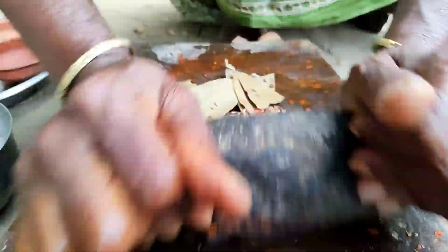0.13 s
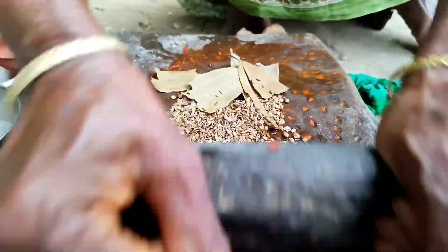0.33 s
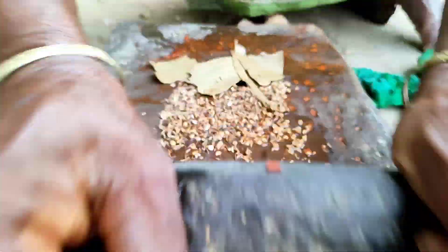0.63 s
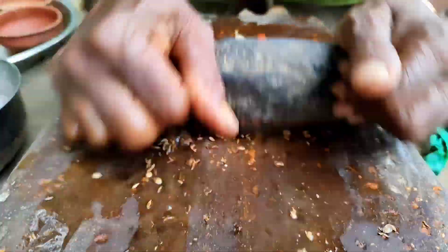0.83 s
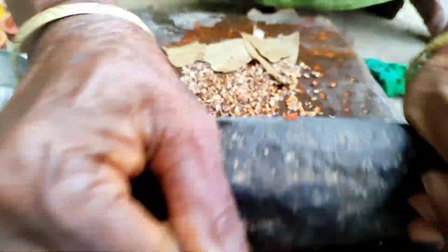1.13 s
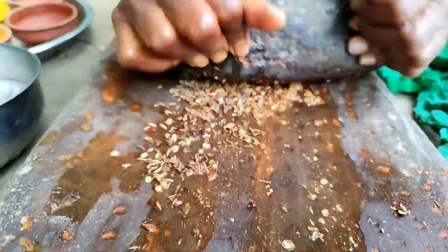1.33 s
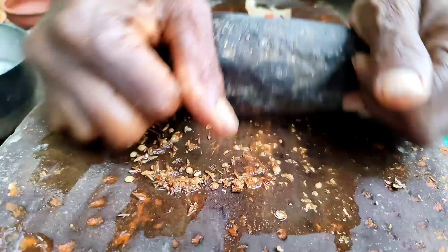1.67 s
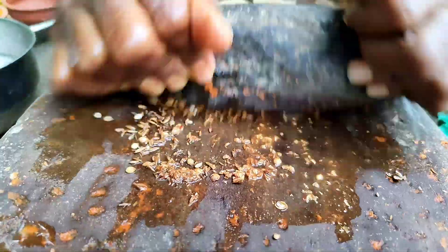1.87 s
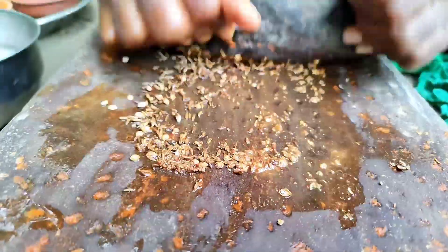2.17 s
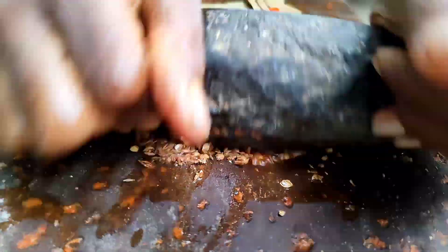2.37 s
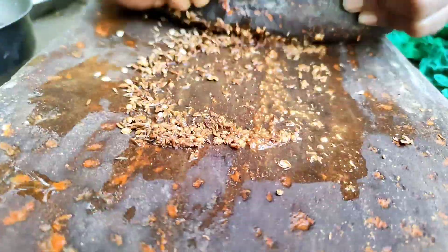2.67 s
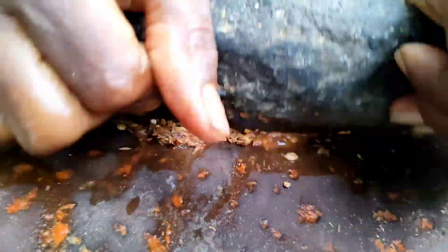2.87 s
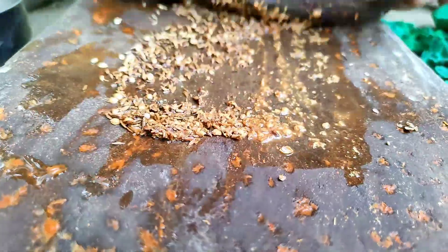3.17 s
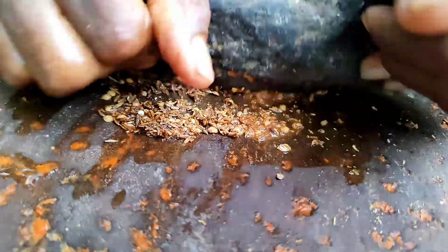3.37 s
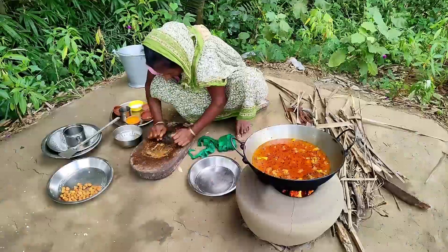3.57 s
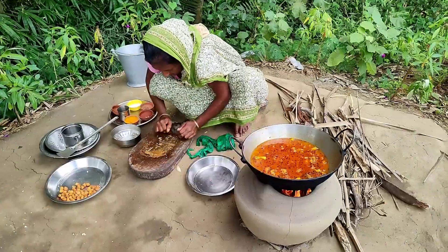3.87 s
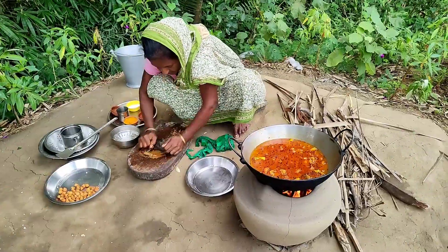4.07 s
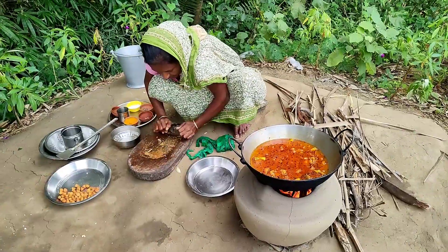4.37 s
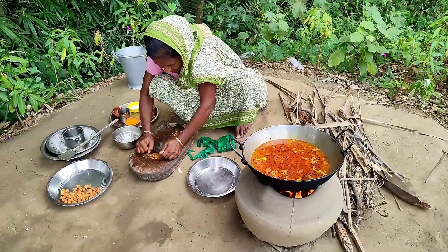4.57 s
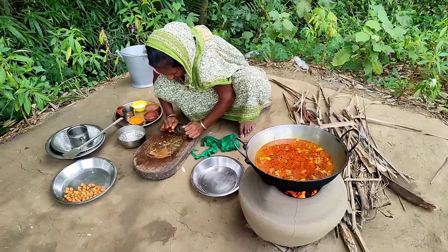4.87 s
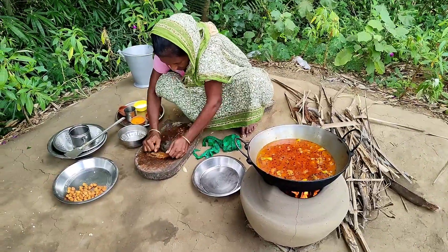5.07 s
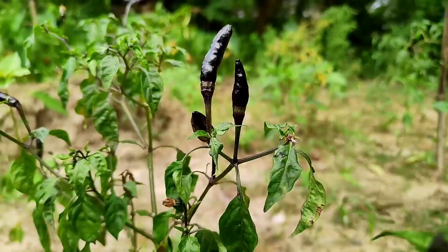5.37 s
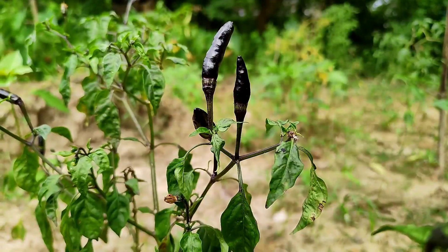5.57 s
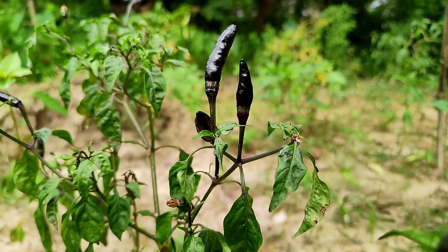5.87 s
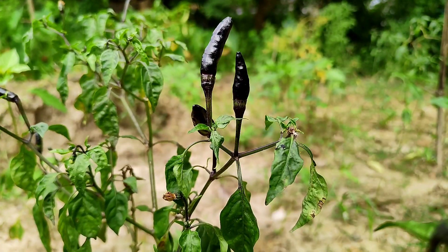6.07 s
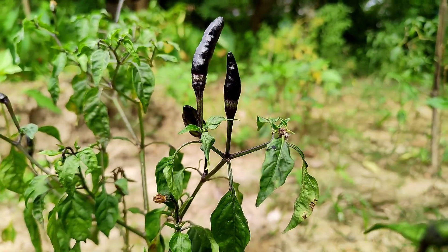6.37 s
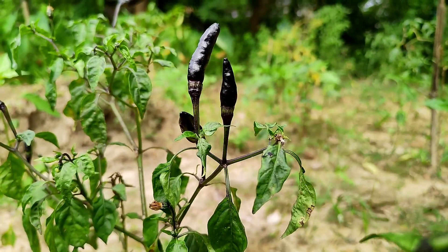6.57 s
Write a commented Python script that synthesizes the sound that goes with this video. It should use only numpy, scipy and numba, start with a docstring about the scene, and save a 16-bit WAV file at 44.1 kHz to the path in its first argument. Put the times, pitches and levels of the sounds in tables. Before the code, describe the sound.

A stone roller scrapes quickly back and forth over a stone slab, crunching dry seeds up close, then fades to faint distant grinding and garden hush.

```python
"""A stone roller is pushed and pulled over a stone slab outdoors, crushing dry seeds.
For 3.8 s it is close: grit cracks in dense clicks, the rough faces make the stones ring and groan,
the roller knocks, seeds burst as short noise, and four dull bumps are rumbles of filtered noise.
Then it works on some metres away until about 5.6 s, with a faint far chirp of narrow noise near 4 s.
From start to end lie a noise hush, gusty low wind and throbbing insects, heard alone at the end."""
import sys
import numpy as np
from scipy import signal
from scipy.fft import rfft, irfft
from scipy.io import wavfile
from scipy.ndimage import uniform_filter1d
from numba import njit

SR = 44100
rng = np.random.default_rng(int(sys.argv[2]) if len(sys.argv) > 2 else 0)


def bounce(signal):
    """Save signal as a 16-bit WAV file at the path given by the first command-line argument."""
    frames = np.transpose(np.atleast_2d(signal))
    limited = np.clip(frames, -1, 1)
    pcm = np.round(limited * 32767).astype(np.int16)
    wavfile.write(sys.argv[1], SR, pcm)


N = 295594

# Pushes and pulls. Each layer swells to a crest (a place from 0 to 1 along the stroke) and fades,
# more narrowly when "peaked" is high. Each row: start in seconds, length in seconds, grit crest, peaked,
# coarse grit in dB, middle grit relative to coarse in dB, fine grit relative to coarse in dB,
# ring crest, peaked, roller ring in dB, groan crest, peaked, slab groan in dB, edge ring in dB,
# thud crest, peaked, ground thud in dB, groan pitch at mid stroke in Hz, basic lean to the left in dB.
STROKES = [(-0.12, 0.18, 0.4, 1.6, -51, -11, -13, 0.45, 3.8, -28, 0.53, 4.2, -40, -38, 0.64, 0.7, -63, 754.0, 1),
           (0.054, 0.3, 1, 0.91, -42, -7, -11, 0.29, 9.8, -36, 0.22, 15.6, -36.5, -41.5, 0.5, 22, -61.5, 732, 2.5),
           (0.203, 0.27, 0.57, 7.1, -45, 0.5, -2.5, 0.63, 6.2, -33, 0.69, 8.1, -37.5, -38.5, 0.66, 4.5, -52.5, 713, 0.5),
           (0.475, 0.26, 0.67, 2.3, -43, -6.0, -9.5, 0.47, 3.5, -37.5, 0.28, 11.5, -39, -40.5, 0.6, 13, -53.5, 755, 1.5),
           (0.704, 0.24, 0.18, 8.6, -33.5, -1, -4.5, 0.07, 3.4, -36, 0.3, 2.7, -48, -44.5, 0.25, 3.4, -51.5, 726.0, 3),
           (0.914, 0.2, 0.7, 2.8, -42.5, -7, -10.5, 0.59, 4.3, -38.5, 0.41, 25, -40, -45.5, 0.46, 3.5, -50, 794.0, 2.5),
           (1.104, 0.27, 0.27, 9.8, -33, -3.5, -7, 0.25, 5.9, -39, 0.4, 8.3, -43.5, -43, 0.39, 4.5, -47.5, 703, 3.5),
           (1.285, 0.26, 0.69, 2.9, -48, -11.5, -12.5, 0.8, 5.1, -32.0, 0.7, 5.5, -40, -51, 0.69, 5.5, -47.5, 756, 3.5),
           (1.5, 0.28, 0.49, 5.5, -34.5, -4.5, -6.5, 0.41, 7.2, -39, 0.53, 4.3, -52.5, -50, 0.49, 2.8, -56, 745.0, 2.5),
           (1.788, 0.292, 0.38, 2.1, -44, -6.5, -7.5, 0.48, 4.8, -47, 0.33, 1.9, -66, -59, 0.37, 12, -55.5, 811.5, 2.5),
           (2.006, 0.28, 0.22, 8.5, -29.5, -3.5, -6.5, 0.12, 6.6, -38.5, 0.27, 6.9, -54.5, -49, 0.17, 3.5, -54, 754.0, 4.5),
           (2.228, 0.299, 0.31, 4.7, -42, -5, -8.5, 0.39, 11.7, -42.5, 0.24, 8.3, -62, -57, 0.28, 15, -57, 745.7, 4.5),
           (2.426, 0.25, 0.24, 5.5, -31, -1.5, -5, 0.2, 5.0, -40, 0.36, 5, -52, -45.5, 0.38, 7.1, -48, 720.0, 4.0),
           (2.643, 0.25, 0.38, 6.2, -44.5, -5.5, -5, 0.56, 5.6, -45.5, 0.45, 4.8, -61.5, -53, 0.38, 8, -54, 685.4, 8),
           (2.815, 0.28, 0.44, 6.7, -34.0, -3.0, -6.5, 0.34, 10.2, -38, 0.44, 4, -53.5, -46, 0.56, 6.5, -52.5, 729, 4.5),
           (3.057, 0.25, 0.45, 6.4, -43.0, -2.5, -5, 0.72, 3.1, -41.5, 0.79, 7.2, -48, -40, 0.55, 7.9, -47.5, 687, 4),
           (3.27, 0.28, 0.44, 3.53, -31, -5, -8, 0.5, 6.4, -40.5, 0.56, 4.3, -55, -55, 0.45, 2.1, -52.5, 741.5, 2),
           (3.555, 0.25, 0.38, 6.9, -45.0, -2.5, -4.5, 0.37, 3.7, -55.0, 0.38, 6.8, -65, -56, 0.37, 15, -54.0, 754.0, 4.5),
           (3.72, 0.117, 0.071, 2.6, -60.5, -7.5, -0.5, 0.24, 4.6, -54.5, 0.06, 0.76, -78.0, -74.5, 0.23, 5.4, -65.0, 734, -4),
           (3.847, 0.181, 0.58, 2.8, -65.5, -10, 1.0, 0.34, 2.7, -64.5, 0.61, 2.7, -77.5, -82, 0.21, 0.66, -76.0, 736.7, -2),
           (4.053, 0.31, 0.31, 10.8, -63.5, -5, -1.5, 0.35, 10, -58, 0.26, 4.7, -74, -72, 0.37, 4, -73.5, 721, -2.0),
           (4.256, 0.223, 0.64, 4.4, -69.0, -3.5, 2.5, 0.53, 4.0, -62.5, 1, 0.83, -80.5, -87, 0.61, 4.2, -78.5, 743, -5),
           (4.494, 0.277, 0.39, 10, -59.5, -8, -7.5, 0.39, 8.8, -55.5, 0.37, 7.9, -71, -69.5, 0.65, 10.4, -77.0, 725, -3.5),
           (4.741, 0.257, 0.42, 5.5, -65, -19, -4, 0.35, 4, -60.5, 0.48, 5, -74.5, -82.5, 0.33, 4.2, -71, 737, -2),
           (4.939, 0.29, 0.4, 5.7, -61, -4.5, -1.5, 0.51, 12.3, -51.5, 0.4, 3.2, -73.5, -69.5, 0.49, 2.8, -74.5, 701, -3),
           (5.212, 0.27, 0.34, 12.8, -58.5, -7, 1, 0.27, 5.6, -65.0, 0.88, 0.76, -84, -80, 0.2, 11.3, -73, 731.0, -7),
           (5.45, 0.167, 0.42, 3.3, -58, -7.5, -5, 0.43, 6.0, -55, 0.29, 4.6, -75, -57.5, 0.49, 3.0, -73.5, 755.0, 0)]
# Stone meets stone. Each row: time in seconds, relative strength in dB,
# relative slab share in dB, relative hardness (share of the edge) in dB.
KNOCKS = [(0.083, -50, -27, 10), (0.0982, -43, -30, 13.5), (0.1777, -30, -15, -9), (0.2466, -33, -14, -14),
          (0.292, -26, -21, -17), (0.3444, -32, -7, -2), (0.3738, -25, -10.5, -5), (0.414, -29.5, -1, -1.5),
          (0.512, -54, -6, 12), (0.5496, -53.5, 5, -9), (0.5863, -24.5, -18, -20), (0.6685, -25, -39, -25),
          (0.7698, -20.5, -15, -33), (0.84, -45, 5, 4), (0.8638, -40.5, -2, -14), (0.9675, -42, -4.5, -20),
          (0.9862, -16, -17.5, -16.5), (1.0496, -45, -35, -24), (1.1296, -36.5, -22, -13),
          (1.1896, -21, -19, -9), (1.2217, -31, -1.5, -2), (1.3568, -40.5, -4.5, -8),
          (1.4054, -31, -12, -14), (1.4263, -20, -36.5, -6.5), (1.4379, -19, -18.5, -19),
          (1.454, -12, -17, -21), (1.4672, -17.5, -23, -25.5), (1.4786, -7, -31.5, -9),
          (1.4941, -11.5, -23.5, -22.5), (1.5782, -31, -14, -25), (1.6026, -35, -19, -7),
          (1.8293, -49.5, -14, 9), (1.8706, -33, -33, -30), (2.0294, -32, -30, -24),
          (2.0683, -31, -20, -15), (2.314, -40, -18, -20), (2.7636, -36, -20, -11),
          (2.8714, -30, -20.5, -7), (3.2022, -34, -23, -20), (3.2322, -25.5, -22, -16),
          (3.2444, -22.5, -18, -9), (4.814, -46.5, -27, -25), (5.4865, -38.5, -28, -3.5)]
# Single seeds burst. Each row: time in seconds, relative strength in dB, pitch in Hz, left minus right in dB.
SEEDS = [(0.213, -35, 4020, 3), (0.2883, -22, 4200, -4), (0.415, -13.5, 3300, 1), (0.633, -22, 3730, -4),
         (0.7243, -24, 3150, 2), (1.125, -31, 3180, 0.0), (1.1425, -18, 6370, 12), (1.154, -12, 6020, -9),
         (1.4775, -29, 3230, -1.5), (1.527, -20.5, 4360, -14.5), (1.5529, -11.5, 6400, -2),
         (1.5905, -30, 3550, -7), (1.6204, -4.5, 3650, 3), (1.8182, -24.5, 2560, 13),
         (1.855, -12, 3760, 7.5), (1.9731, -18, 3700, 7), (2.0103, -38, 3760, -0.5),
         (2.0247, -19, 3940, -4), (2.397, -18.5, 3680, 5), (2.4493, -40, 3600, 4), (2.4504, -38.5, 3000, 8),
         (2.6417, -26, 12300, -3), (2.832, -22, 4800, -1), (2.8888, -23, 4040, -17), (3.0984, -40, 3890, 1),
         (3.1118, -17, 5870, -1), (3.2923, -10.5, 4470, -6), (3.3144, -22, 3350, 19), (3.334, -16, 3530, 7),
         (5.2784, -37.5, 4080, -3)]

# Ringing tones (modes) of each body. Each row: pitch in Hz, relative level in dB,
# time to fall by 60 dB in seconds.
ROLLER_MODES = [(1273, -22, 0.027), (1330, 1, 0.081), (1357.5, -2.5, 0.044), (1480, -23, 0.041)]
SLAB_MODES = [(507, -13, .025), (700, 1, 0.064), (770, -2.5, 0.036), (943, -2.5, 0.15)]
EDGE_MODES = [(1689, -3, 0.062), (1903, -1.5, 0.066), (2080, -1.5, 0.024), (2450, -6.5, 0.017),
              (3190, -8.5, 0.007), (3523, -11.5, 0.02)]
GROUND_MODES = [(137, 3.5, 0.028), (163.3, 8.2, 0.05)]

# Colour of coarse, middle and fine grit. Each row: frequency in Hz, relative level in dB.
COARSE_COLOUR = [(250, -22.5), (500, -18.5), (1000, -20), (1600, -12), (2200, -5.5), (2900, -2), (3400, 1),
                 (4000, 0), (4600, -6), (5200, -17.5), (8000, -49)]
MIDDLE_COLOUR = [(3000, -34.5), (4700, -16), (5300, -11), (6200, -0.5), (6900, -11.5), (7500, -14.5),
                 (8300, -21.5), (11000, -47.5)]
FINE_COLOUR = [(5000, -45), (7300, -15.5), (8100, -1.5), (8800, -3), (10500, -6.5), (12300, -7),
               (13400, -6.5), (14900, -0.5), (16000, -13.5)]
# How the two ports (left and right ears) differ for grit.
# Each row: frequency in Hz, left minus right in dB before it is narrowed.
PORT_COLOUR = [(700, 1.5), (2400, 3), (4400, -1), (6200, -12.5), (8100, 1), (15000, -14)]
# Colour of the grit and of the rubbing stones when far. Each row: frequency in Hz, gain in dB.
FAR_GRIT_COLOUR = [(500, 4), (1600, 6), (2200, -5.5), (3300, 3.5), (4500, -4.5), (6000, -1.5), (8000, -4),
                   (11000, 2), (15000, -6)]
FAR_STONE_COLOUR = [(100, .5), (800, 0), (1150, -3.5), (1290, 3), (1340, .5), (1450, -6.5), (1650, -10),
                    (1950, 3.5), (3500, -0.5)]

# The slab bumps the ground at the end of a pull. Each row: start in seconds, level at the crest in dB.
BUMPS = [(1.295, -52.5), (1.725, -56.5), (2.575, -43.5), (3.5, -59.5)]
# Colour of the bumps. Each row: frequency in Hz, relative level in dB.
BUMP_COLOUR = [(60, -13), (130, -1.5), (300, -4.5), (600, -10.5), (1000, -16), (2000, -46)]
# Colour of the garden hush. Each row: frequency in Hz, relative level in dB.
HUSH_COLOUR = [(120, -29), (200, -9), (300, -5.5), (500, -9.5), (1140, -20), (2280, -8), (3090, -11),
               (3700, -10), (4900, -22.5), (6000, -10.5), (7790, -18.5), (9140, -21), (14000, -34.5)]
# Sides of the hush. Each row: frequency in Hz, left minus right in dB.
HUSH_PAN = [(60, 1.5), (110, 10), (200, -6.5), (380, 1), (700, 0.5), (1290, 4), (2380, -9), (4400, -6),
            (8120, -6), (15000, -3.5)]
# Wind strength, before quick flutter. Each row: time in seconds, level of the shared part in dB.
WIND = [(0.0, -73), (0.39, -64), (0.49, -69), (0.9, -72), (1.03, -65.5), (1.98, -68.5), (2.14, -61),
        (2.18, -71), (2.65, -60), (2.69, -68.5), (3.53, -68), (3.56, -75), (3.71, -60), (4.12, -70.5),
        (5.37, -70), (5.65, -59.5), (6.05, -73), (6.7, -66)]
# Colour of the wind. Each row: frequency in Hz, relative level in dB.
WIND_COLOUR = [(12, -24.5), (20, 2.5), (48, 0), (81, -2), (166, -12), (200, -21), (300, -34), (390, -69.5),
               (660, -120)]
# Far insects. Each row: pitch in Hz, width in Hz, middle level in dB, level steps per second,
# left minus right in dB.
INSECTS = [(2453, 160, -85, 20, -8.5), (3132, 150, -79, 25, -13.5), (7980, 140, -95, 2, -4.5)]

# change from start to end of a stroke
GROAN_SAG_HZ, FINE_RISE_DB, MIDDLE_RISE_DB, PAN_DRIFT_DB = 88.4, 5.5, -2.5, 1
# loose grit rustles on through each turn: level below the stroke's grit, spread in stroke lengths
TRICKLE_DB, TRICKLE_SPREAD = -30, 0.51
FAR_FROM_S = 3.79  # from here on the grinding is some metres away
GRIP_T60_S, KNOCK_LOW_HZ = 0.17, 380  # the hands damp each blow; small stones radiate little bass
BUMP_RISE_S = 0.01
HUSH_DB = -72.0
TOP_HZ = 15500


def strokes(t):
    """Turn the pushes and pulls into layer levels over time; strokes that overlap at a turn add up."""
    steps = t[::256]  # coarse time steps, joined up by straight lines
    (start, length, grit_at, grit_peaked, grit_db, middle_db, fine_db,
     ring_at, ring_peaked, ring_db, groan_at, groan_peaked, groan_db, edge_db,
     thud_at, thud_peaked, thud_db, groan_hz, pan_db) = np.transpose(STROKES)[:, :, None]
    along = (steps - start) / length
    # each stroke counts most at its middle
    weight = np.exp(-np.minimum((along - .5) ** 2 * 20, 600))

    def level(db, at, peaked, rest=0):
        """Sum the swells of all strokes, in dB."""
        gain = np.sum(undb(db) * (swell(along, at, peaked) + rest), axis=0)
        return np.interp(t, steps, 20 * np.log10(gain + 1e-6))

    def held(value, change):
        """Blend a setting between neighbouring strokes while it drifts along each one."""
        drifting = value + change * np.clip(along - .5, -.5, .5)
        return np.interp(t, steps, np.sum(weight * drifting, axis=0) / np.sum(weight, axis=0))

    trickle = undb(TRICKLE_DB) * np.exp(-((along - .5) / TRICKLE_SPREAD) ** 4)
    crushing = (level(grit_db, grit_at, grit_peaked, trickle),
                held(middle_db, MIDDLE_RISE_DB),
                held(fine_db, FINE_RISE_DB))
    stones = (level(ring_db, ring_at, ring_peaked),
              level(edge_db, groan_at, groan_peaked),
              level(groan_db, groan_at, groan_peaked),
              held(groan_hz, -GROAN_SAG_HZ),
              level(thud_db, thud_at, thud_peaked))
    return crushing, stones, held(pan_db, PAN_DRIFT_DB)


def swell(along, crest, peaked):
    """Gain 0 at both ends of a stroke and 1 at its crest."""
    along, crest = np.clip(along, 0, 1), np.clip(crest, .05, .95)
    rise = (along / crest) ** crest
    fall = ((1 - along) / (1 - crest)) ** (1 - crest)
    return (rise * fall) ** peaked


def grit(coarse_db, middle_db, fine_db, pan_db):
    """Grains break all along the roller; each port hears them direct and off the slab."""
    surge = undb(2.0 * walk(40) + 1.9 * walk(250))
    shared = crackle(3000, 1.2)
    sizes = ((COARSE_COLOUR, 0), (MIDDLE_COLOUR, middle_db), (FINE_COLOUR, fine_db))
    out = []
    # side is how far the port leans: left is positive, right negative
    for side, lag_s in ((0.84, 0.001), (-0.61, 0.0059)):
        own = fragments(spread_db=4.5, cycles=170.0)
        direct = surge * (1.06 * late(shared, lag_s) + 0.46 * own)
        # the bounce path changes as the roller travels, so its notches glide
        bounce_s = 0.0003975 * (1 + 0.28 * walk(3.005))
        clicks = direct + 0.74 * late(direct, bounce_s)
        mix = 0
        for shape, share_db in sizes:
            flicker_db = 3.4 * walk(30)
            mix = mix + undb(coarse_db + share_db + flicker_db) * unit(colour(clicks, shape))
        out.append(undb(side * pan_db / 2) * colour(mix, PORT_COLOUR, share=side / 2))
    return np.array(out)


def fragments(spread_db, cycles, count=16000):
    """Splinters of all pitches, many faint and few loud; even energy per Hz."""
    when, pitch, size = rng.random((3, count))
    hz = 1500 + 14500 * pitch
    gain = np.sqrt(hz) * undb(-spread_db * np.log(np.maximum(size, .01)))
    return unit(splinters((when * N).astype(np.int64), hz, gain, cycles))


@njit
def splinters(start, hz, size, cycles):
    """Each splinter rings at its own pitch and dies within some cycles."""
    y = np.zeros(N)
    for k in range(len(start)):
        # one turn of this spinning number per sample makes a fading sine
        pole = np.exp((2j * np.pi - np.log(1000) / cycles) * hz[k] / SR)
        z = size[k] + 0j
        end = min(start[k] + int(.7 * cycles / hz[k] * SR), N)
        for i in range(start[k], end):
            y[i] += z.imag
            z *= pole
    return y


def rubbing(roller_db, edge_db, slab_db, slab_hz, thud_db, pan_db):
    """Bumps of the rough faces shake roller and ground; the slab groans at a pitch set by where it is pressed."""
    # each row: body, level in dB, bumps per second, lag of the right port in seconds, lean to the left in dB
    bodies = ((ROLLER_MODES, roller_db, 3500, .00016, .1),
              (EDGE_MODES, edge_db, 1200, .0003, .1),
              (GROUND_MODES, thud_db, 600, .0004, -1.5))
    out = 0
    for body, db, rate, lag_s, lean_db in bodies:
        roughness = crackle(rate, 1.5)
        shaken = ring(roughness * undb(db), body) / np.std(ring(roughness, body))
        out = out + ports(shaken, pan_db + lean_db, lag_s)
    # two moving filters in a row: a sharp peak inside a wide one
    sharp = sweep(crackle(900, 1.8), slab_hz, 130.0)
    groan = unit(sweep(sharp, slab_hz, 450.0))
    return out + ports(groan * undb(slab_db), pan_db + 4.0, 0.0002)


def knocks(pan_db):
    """Each blow is a rough contact of a ms or two into the roller, slab and edge modes."""
    t = np.arange(4096) / SR
    grain = rng.standard_normal((len(KNOCKS), 4096))
    out = np.zeros(N)
    for (s, db, slab_db, hard_db), rough in zip(KNOCKS, grain):
        contact = (1 + 0.52 * uniform_filter1d(rough, size=6)) * t * np.exp(-t / 0.00044)
        blow = 0
        for body, share_db in ((ROLLER_MODES, 0), (SLAB_MODES, slab_db + 8.0), (EDGE_MODES, hard_db + 5.0)):
            tone = ring(contact, body)
            blow = blow + undb(share_db) * tone / np.abs(tone).max()
        i = int(s * SR)
        out[i:i + 4096] += undb(db + 2.9) * blow * undb(-60 * t / GRIP_T60_S)
    low_cut = signal.butter(3, KNOCK_LOW_HZ, "high", fs=SR, output="sos")
    return ports(signal.sosfilt(low_cut, out), pan_db - 1.5, .00014)


def seeds():
    """Each burst is a few ms of noise around its pitch."""
    out, t = np.zeros((2, N)), np.arange(512) / SR
    chance = rng.standard_normal((len(SEEDS), 2, 512))  # separate noise at each port
    for (s, db, hz, pan_db), noise in zip(SEEDS, chance):
        band = signal.butter(2, [hz / 1.5, min(hz * 1.5, 18000)], "band", fs=SR, output="sos")
        burst = signal.sosfilt(band, noise * np.exp(-t / .0015))
        lean_db = np.array([[pan_db], [-pan_db]]) / 2
        i = int(s * SR)
        out[:, i:i + 512] += undb(db - 7.5 + lean_db) * burst / np.abs(burst).max()
    return out


def bumps(t):
    """The slab bumps the ground: dull, short rumbles of noise that rise fast and fade."""
    start, db = np.transpose(BUMPS)[:, :, None]
    since = np.maximum(t - start, 0) / BUMP_RISE_S
    gain = np.sum(undb(db) * since * np.exp(1 - since), axis=0)
    rumble = unit(colour(rng.standard_normal(N), BUMP_COLOUR))
    return ports(gain * rumble, 1.6, .0003)


def wind(t):
    """Low gusts of noise, partly shared by both ports and partly opposed."""
    mid = unit(colour(rng.standard_normal(N), WIND_COLOUR, size=16384))
    side = unit(colour(rng.standard_normal(N), WIND_COLOUR, size=16384))
    gusts = undb(np.interp(t, *np.transpose(WIND)) + 3.0 * walk(21))
    return gusts * (mid + .6 * side * np.array([[1], [-1]]))


def insects():
    """Narrow, throbbing whirs from the bushes: noise through a narrow filter of wandering pitch."""
    out = 0
    for hz, width, db, rate, pan_db in INSECTS:
        pitch = hz * (1 + 0.0056 * walk(2.0))
        whir = unit(sweep(rng.standard_normal(N), pitch, 1. * width))
        out = out + ports(whir * undb(db + 5.3 * walk(rate)), pan_db, 0.00017)
    return out


def chirp(t):
    """A faint far chirp: one soft swell of narrow noise."""
    centre_s, spread_s, hz, width_hz, level_db = 4, 0.25, 5500.0, 500.0, -82
    tone = unit(sweep(rng.standard_normal(N), np.full(N, hz), width_hz))
    gain = undb(level_db) * np.exp(-((t - centre_s) / spread_s) ** 2)
    return ports(tone * gain, -3.0, .0002)


def hush():
    """The garden's wide faint hush: separate noise at each port, slowly changing in level."""
    sides = []
    for side in (1, -1):
        noise = unit(colour(rng.standard_normal(N), HUSH_COLOUR))
        sides.append(colour(noise, HUSH_PAN, share=side / 2))
    return undb(HUSH_DB + 1.2 * walk(3.2)) * np.array(sides)


def undb(db):
    """Turn dB into gain."""
    return 10 ** (np.asarray(db) / 20)


def unit(x):
    """Scale to an average (rms) level of 1."""
    return x / np.sqrt(np.mean(x ** 2))


def colour(x, points, share=1, size=4096):
    """Filter by (Hz, dB) points without ringing ahead of time, using the folded cepstrum."""
    hz, db = np.transpose(points)
    grid = np.maximum(np.fft.rfftfreq(size, 1 / SR), 1)
    log_gain = share * np.interp(np.log(grid), np.log(hz), db) * np.log(10) / 20
    cepstrum = irfft(log_gain)
    # fold the second half onto the first, so the filter only looks back
    cepstrum[1:size // 2] *= 2
    cepstrum[size // 2 + 1:] = 0
    response = irfft(np.exp(rfft(cepstrum)))[:size // 2]
    return signal.fftconvolve(x, response)[:N]


def ring(x, modes):
    """A shaken body rings at its decaying modes; it radiates little below the lowest."""
    out = 0
    for hz, db, t60 in modes:
        pole = np.exp(2j * np.pi * hz / SR - np.log(1000) / (t60 * SR))
        tone = signal.lfilter([0, pole.imag], [1, -2 * pole.real, abs(pole) ** 2], x)
        out = out + undb(db) * tone
    low_cut = signal.butter(3, 0.91 * modes[0][0], "high", fs=SR, output="sos")
    return signal.sosfilt(low_cut, out)


@njit
def sweep(x, hz, width):
    """Band-pass filter whose centre can move every sample."""
    y, band, low = np.empty(len(x)), 0., 0.
    for i in range(len(x)):
        g, damping = np.tan(np.pi * hz[i] / SR), width / hz[i]
        v = (band + g * (x[i] - low)) / (1 + g * (g + damping))
        band, low, y[i] = 2 * v - band, low + 2 * g * v, damping * v
    return y


def late(x, s):
    """Delay by s seconds, which may change with time."""
    return np.interp(np.arange(N) - s * SR, np.arange(N), x)


def walk(rate):
    """Random levels, held for 1 / rate seconds and smoothed twice."""
    k = int(SR / rate)
    steps = np.repeat(rng.standard_normal(N // k + 1), k)
    return uniform_filter1d(uniform_filter1d(steps, k), k)[:N]


def crackle(rate, spread_db):
    """Clicks at random moments, about rate per second, many small and few large."""
    count = int(20000 * N / SR)
    when, keep, size, sign = rng.random((4, count))
    kept = keep < rate * N / SR / count
    heights = undb(-spread_db * np.log(np.maximum(size, .01)))
    out = np.zeros(N)
    out[(when * N).astype(int)] = kept * heights * np.sign(sign - .5)
    return unit(out)


def ports(x, pan_db, lag_s):
    """One source at two ports, left and right; the right hears it later."""
    return np.array([x * undb(pan_db / 2), late(x, lag_s) * undb(-pan_db / 2)])


def further(t, near, shape):
    """Distance changes the colour of the sound from FAR_FROM_S on."""
    return np.where(t < FAR_FROM_S, near, [colour(port, shape) for port in near])


def scene():
    """Add up the grinding and the garden around it."""
    t = np.arange(N) / SR
    crushing, stones, pan_db = strokes(t)
    work = further(t, grit(*crushing, pan_db), FAR_GRIT_COLOUR)
    work = work + further(t, rubbing(*stones, pan_db), FAR_STONE_COLOUR)
    work = work + knocks(pan_db) + seeds() + bumps(t)
    return work + wind(t) + insects() + chirp(t) + hush()


def record(dry):
    """The phone cuts the top steeply above TOP_HZ."""
    return signal.sosfilt(signal.ellip(8, .2, 60, TOP_HZ, fs=SR, output="sos"), dry)


dry = scene()
out = record(dry)
bounce(out)
```